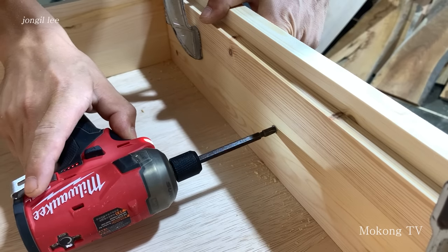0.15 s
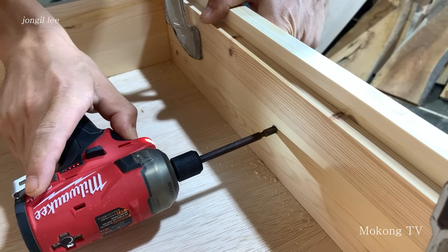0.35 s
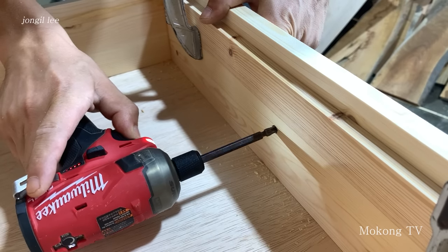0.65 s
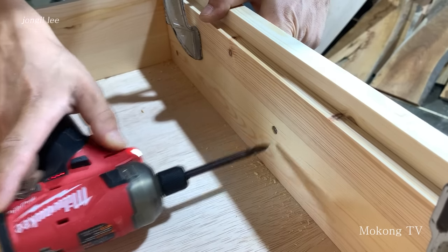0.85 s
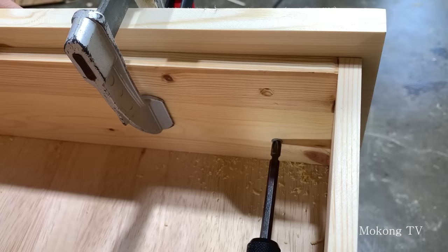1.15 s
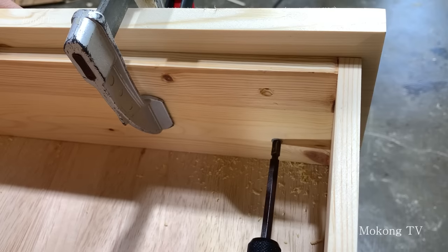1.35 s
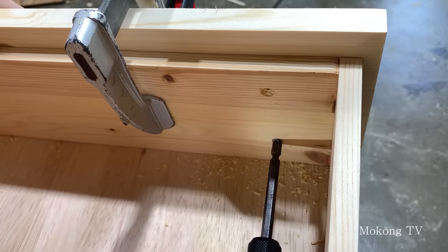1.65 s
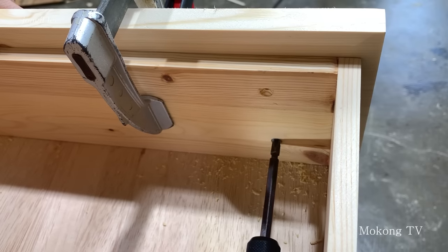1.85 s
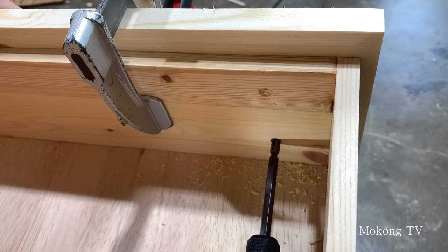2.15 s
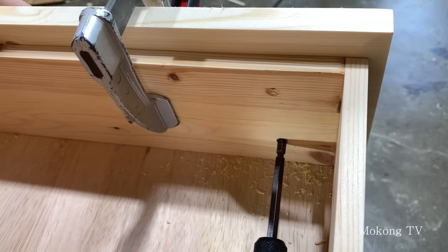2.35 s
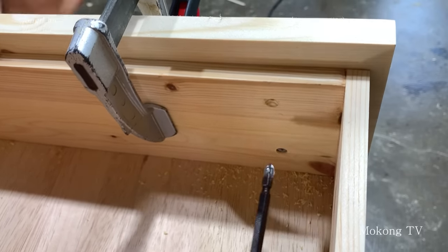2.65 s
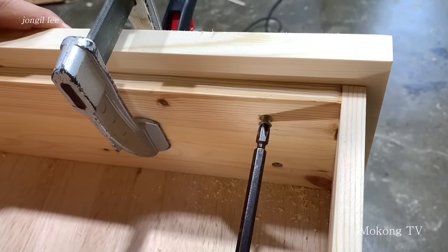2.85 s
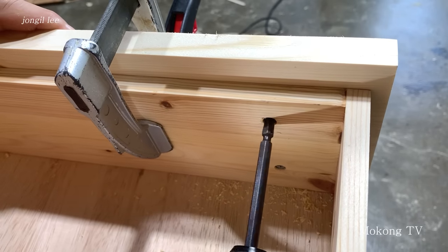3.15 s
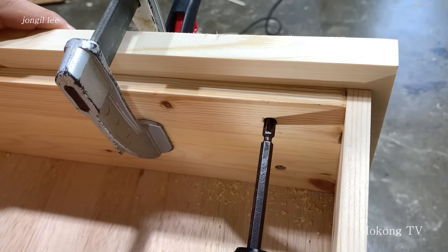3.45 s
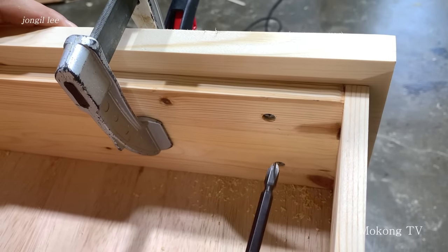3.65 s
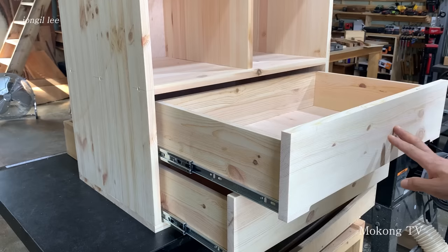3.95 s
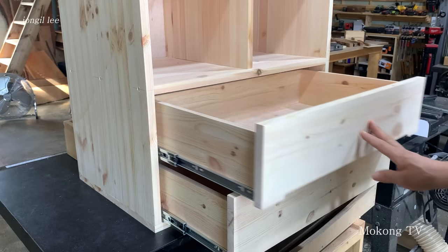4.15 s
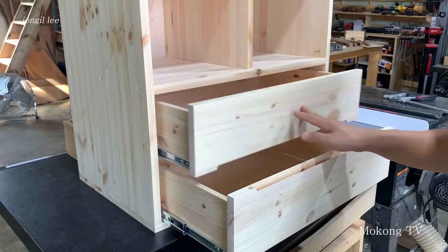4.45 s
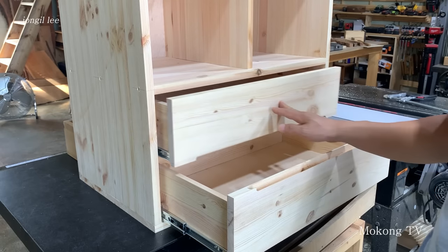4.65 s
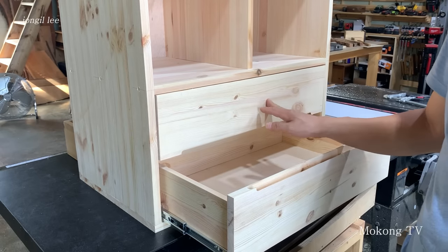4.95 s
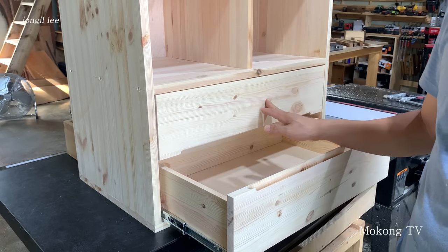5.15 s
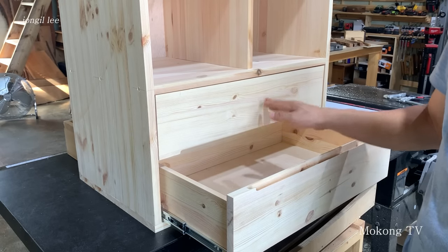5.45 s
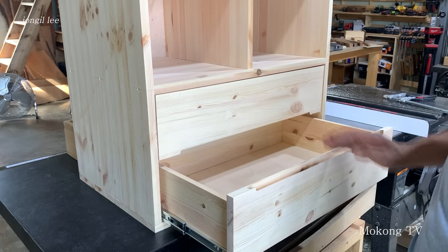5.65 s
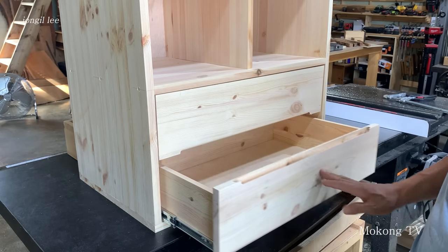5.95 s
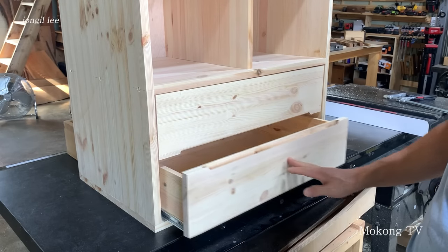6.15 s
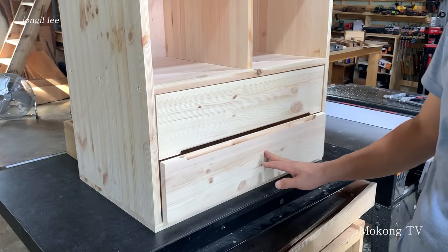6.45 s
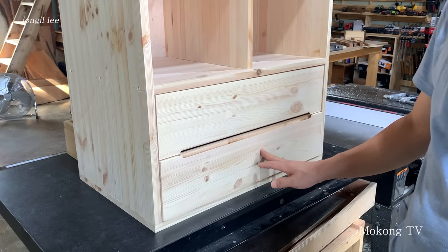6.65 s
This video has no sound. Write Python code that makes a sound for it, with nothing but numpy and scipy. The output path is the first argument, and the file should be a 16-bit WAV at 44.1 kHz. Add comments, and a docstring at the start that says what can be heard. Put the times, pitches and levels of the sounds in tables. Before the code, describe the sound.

Rapid woody ratcheting and whining from a cordless impact driver in three bursts, bit clacks between, then drawers rumble closed and knock in a workshop.

```python
"""Impact driver and rolling drawers

An impact driver sinks three screws into a clamped pine drawer: its motor whistles and its gears whine.
Evenly paced hammer blows excite the damped modes of the boards, with noise bursts for rasp and snap.
The bit clacks out of the screw heads; then two drawers roll shut on ball-bearing slides (filtered random
impulses), hit their catches and settle. A roomy workshop answers with a decaying tail and a low hum."""
import sys
import numpy as np
from scipy import signal
from scipy.fft import rfft, irfft, next_fast_len
from scipy.io import wavfile
from scipy.ndimage import uniform_filter1d, map_coordinates

SR = 44100
rng = np.random.default_rng(int(sys.argv[2]) if len(sys.argv) > 2 else 0)


def log_audio(samples):
    """Write samples as a 16-bit WAV file to the path given in sys.argv[1]."""
    # one column per channel
    frames = np.atleast_2d(samples).T
    # limit to full scale, then quantise
    limited = np.clip(frames, -1, 1)
    pcm = np.round(limited * 32767).astype(np.int16)
    wavfile.write(sys.argv[1], SR, pcm)


N = 299880  # length [samples]

# Levels in the tables are relative: the functions add their own offsets.
# Decay of the workshop: (frequency [Hz], t60 [s])
ROOM_DECAY = [(80, 1), (300, 0.34), (1500, 0.66), (4000, 0.69), (8000, 0.51), (15000, 0.57)]
# Spectrum of the workshop hum: (frequency [Hz], level [dB])
SHOP_HUM = [(15, -63.5), (30, -42.5), (58, 1.5), (77, 0), (99, -10.5), (178, -11.5), (215, -14.5),
            (305, -8.5), (552, -16), (598, -12), (648, -18.5), (1200, -24.5), (7100, -43), (8580, -38),
            (15500, -54)]
# Loss of the drawers' sound on its way to the room: (frequency [Hz], level [dB])
DRAWER_SEND = [(200, -9.5), (700, 1.0), (4000, -4.5)]

# Modes of the two drawers in their cabinet, and of the steel slide rails:
# (frequency [Hz], energy [dB], t60 [s])
UPPER_BOX = [(67, -12, 0.45), (101.2, 0, 0.64), (131, -23, 0.26), (173, 0, 0.32), (212.3, -1, 0.22),
             (250, -4.5, 0.16), (309.6, -2.5, 0.15), (429, -14, 0.16), (510, -15.5, 0.24)]
LOWER_BOX = [(132.5, -2, 0.16), (181, -2.5, 0.26), (221, -0.5, 0.11), (264.3, -2, 0.36), (304.6, 4.5, 0.15),
             (472, -15, 0.099)]
RAIL_MODES = [(2250, -8, 0.45), (2870, -2, .5), (3540, 4.5, .45), (3880, -1.5, .4), (4400, 1, .5),
              (5190, -4, 0.65), (6200, 1, 0.27), (7000, -2, .4), (8100, -14, .45)]
# Each drawer's catches, end stops and landing: (time [s], thud [dB], clack [dB], tick [dB])
UPPER_KNOCKS = [(3.996, -58, -73, -57.5), (4.004, -66, -71, -51.5), (4.343, -47, -42, -58),
                (4.352, -29, -50, -69), (4.361, -45, -52, -71), (4.448, -30.5, -35, -60),
                (4.462, -48, -54, -51.5), (4.715, -52, -55, -93), (4.88, -47.5, -67, -89.5),
                (5.262, -27, -46, -72.5), (5.287, -38, -57, -86)]
LOWER_KNOCKS = [(6.164, -40, -42, -69), (6.211, -39.5, -41, -58), (6.222, -45, -50, -63),
                (6.56, -61, -58, -88.5)]
# Each drawer's rolling: (time [s], level [dB])
UPPER_RUN = [(3.98, -90), (4.08, -61), (4.17, -50.5), (4.33, -49), (4.5, -54), (4.62, -54.5), (4.74, -58.5),
             (4.83, -61), (4.94, -66.5), (5.0, -82)]
LOWER_RUN = [(5.83, -72), (5.93, -52.5), (6.03, -48.5), (6.15, -43), (6.3, -55), (6.45, -52), (6.6, -80),
             (6.8, -63.5)]
# The soft-close damper's drag: (time [s], level [dB])
DAMPER_DRAG = [(4.66, -61.5), (4.72, -49.5), (4.78, -57), (4.83, -71), (4.9, -65), (4.96, -75)]
# The lower rail's squeak: (time [s], pitch [Hz], level [dB])
SQUEAK = [(5.82, 4480, -88), (5.85, 4560, -79), (5.89, 4620, -77), (6.06, 4670, -78.5),
          (6.15, 4540, -77), (6.2, 4380, -76)]
# Spectra of woody contacts, rail ticks, rolling, its brighter part and the damper:
# (frequency [Hz], level [dB])
CLACK_COLOUR = [(150, -32), (330, 6.5), (480, 5.5), (800, -6), (1400, -9.5), (2200, -16), (3200, -18),
                (6000, -38.5), (15000, -59.5)]
UPPER_TICK = [(1000, -5), (3300, -1), (5500, -1), (8200, -5.5), (9500, -13.5), (15000, -41)]
LOWER_TICK = [(1000, -14), (2200, 6.5), (3200, 5), (4200, -6.5), (8500, -10), (15000, -41)]
ROLLING_COLOUR = [(71, -51), (120, -19), (179, 1), (222, -9), (307, 0), (368, -7), (425, 1.5), (744, -12),
                  (1510, -19.5), (2590, -34), (4700, -40.5), (9000, -53), (11700, -82), (19800, -120)]
ROLLING_BRIGHT = [(500, -20), (1100, -0.5)]
DAMPER_HUM = [(250, -26), (380, -9), (441, 3), (500, -7), (600, -24), (1000, -51)]

# The bit engaging, seating or leaving a screw, and the tool against the drawer: (time [s], thud [dB],
# boom pitch [Hz], boom t60 [s], sway [dB], clack [dB], clack pitch [Hz], tick [dB])
TOOL_KNOCKS = [(.825, -32, 179, .15, -50, -47.5, 395, -70), (.861, -36, 128.5, 0.9, -42, -37.5, 403, -40.5),
               (2.453, -35, 160, 0.11, -34, -35, 521, -36), (2.515, -39, 167, 0.096, -54, -49, 368, -73.5),
               (2.572, -42, 159, 0.1, -55, -51, 550, -63.5), (2.701, -50.5, 167, .15, -68, -65, 450, -61),
               (2.778, -42, 205, .1, -60, -52.5, 297.4, -68), (2.803, -38, 165, .1, -60, -36.5, 480, -60),
               (3.258, -17.5, 152.2, 0.13, -34, -30, 498, -55),
               (3.36, -33.5, 174, 0.14, -54, -48, 470, -65),
               (3.512, -41.5, 170.7, 0.34, -55, -53.5, 450, -58.5),
               (3.583, -40, 171, 0.18, -57, -55, 325, -55),
               (3.606, -37.5, 132.2, 0.45, -54.5, -58, 434, -51),
               (3.82, -55, 173.4, .3, -66.5, -60, 880, -70),
               (3.855, -59.5, 130, 0.19, -69.5, -64.5, 436, -81.5)]
# Modes of the rocking drawer, the clamp's steel bar and the steel bit:
# (frequency [Hz], energy [dB], t60 [s])
SWAY_MODE = [(64, 0, 0.34)]
CLAMP_MODES = [(893, -5, 1.3), (1017, 2, 1.9), (1367, -10, 1.3)]
BIT_MODES = [(2950, -6.5, .03), (3377, -5, 0.014), (4123, -0.5, .04), (4930, -2.5, .03), (6170, -7.5, .03),
             (14450, -9, .015)]
# Jolts that reach the clamp: (time [s], level [dB])
CLAMP_JOLTS = [(2.257, -53), (3.271, -46)]

# Motor at each screw: (time [s], winding rate [Hz], whistle [dB], gear noise [dB])
MOTOR_1 = [(0, 660, -39, -34), (.11, 660, -39, -33), (.15, 660, -45, -32), (.66, 660, -43, -31),
           (.72, 700, -54, -32)]
MOTOR_2 = [(1.164, 350, -47, -33), (1.6, 345, -48, -35), (2.022, 345, -48, -35), (2.05, 800, -47, -29),
           (2.12, 1350, -51, -26), (2.26, 1400, -51, -28)]
MOTOR_3 = [(2.785, 10, -54, -70), (2.81, 280, -44, -32), (2.845, 750, -43, -26), (2.895, 1170, -51, -32),
           (3.0, 1200, -51, -31), (3.04, 1450, -51, -28), (3.22, 1470, -52, -27), (3.28, 1400, -58, -33)]
# Gear whine at each screw: (time [s], tooth rate [Hz], level [dB])
WHINE_1 = [(0, 1042, -35.5), (0.3, 1042, -42.5), (0.72, 1038, -44)]
WHINE_2 = [(2.03, 904, -45.5), (2.08, 1345, -33), (2.26, 1330, -37)]
WHINE_3 = [(2.8, 900, -41), (2.85, 1400, -37), (2.89, 1720, -33), (3.0, 1715, -32), (3.04, 1575, -33),
           (3.24, 1565, -36)]
# Overtones of the gear whine: (multiple [1], level [dB])
TOOTH_ORDERS = [(1, -6), (2, -12), (3, -7), (4, 0), (5, -9), (6, -6)]
# Groan of the wood as the first screw's tip bites: (time [s], slip rate [Hz], level [dB])
BITE = [(0, 161, -32.5), (.025, 171.4, -25), (.07, 194.5, -18), (.1, 171.6, -32.5), (.14, 169.2, -21),
        (.22, 169, -17.5), (.27, 156, -39)]

# Steady runs of blows at each screw: (first blow [s], rate [blows/s], count [1])
PACE_1 = [(0.008, 26, 2), (.096, 30, 1), (0.129, 32.38, 19), (.7175, 30, 1)]
PACE_2 = [(1.17, 18.6, 4), (1.3857, 19.4, 13)]
PACE_FAST = [(2.0505, 39.92, 8), (2.257, 32, 1)]
PACE_3 = [(2.851, 16, 2), (2.95, 27.8, 2), (3.0172, 45.6, 11), (3.247, 41, 2)]
# How hard each screw resists as it sinks: (time [s], force [dB], snap [dB])
EFFORT_1 = [(.039, -32.5, -43.5), (.095, -29.5, -47), (.129, -25, -42.5), (.2, -24, -38.5),
            (.27, -26, -32.5), (.5, -25, -39.5), (.6, -23.5, -35), (.711, -25.5, -29)]
EFFORT_2 = [(1.17, -31, -60), (1.28, -28.5, -47), (1.39, -23.5, -44.5), (1.62, -23, -47.5), (1.8, -21, -47),
            (1.92, -20.5, -41), (2.01, -20.5, -41.5), (2.1, -19.5, -28.5), (2.26, -20.5, -32)]
EFFORT_3 = [(2.81, -38, -49), (2.859, -26, -31), (2.95, -27.5, -30.5), (2.99, -23, -34.5), (3.06, -20, -32),
            (3.19, -20, -33), (3.269, -23, -41)]
# Drawer modes as driven from each screw; TIGHT once the second screw pulls the boards together:
# (frequency [Hz], energy [dB], t60 [s])
BOARD_1 = [(65, -21, .25), (97.4, -8, 0.52), (129.1, -7, 0.97), (156.6, -6.5, 0.097), (190.8, -7.5, .12),
           (288, -13, 0.15), (385, -12, 0.055), (471.6, -3.5, .075), (583, -3.5, .08), (629, 1, .07),
           (657, -2.5, .06), (820, -9, 0.067), (877, -9.5, 0.064), (971, -2.5, 0.18), (1253, 4, .068),
           (1650, -11, .045), (2060, -11.5, .036)]
BOARD_2 = [(78, -8, 0.37), (132, -7.5, .11), (172.7, 3.5, .25), (266.4, -1, .14), (335, -5.5, .07),
           (411, -3, 0.1), (497.6, 2.5, .075), (614.6, -11, 0.028), (697, -8.5, .05), (873, 1, .078),
           (1060, 0, 0.034), (1310, -3.5, .022), (1474, -7, 0.056), (1764, -12.5, 0.041), (2200, -15, 0.04)]
BOARD_TIGHT = [(75.56, -3.5, 0.5), (157, -3, 0.09), (196, 3, .2), (261.4, -2, 0.33), (325, -2.5, .12),
               (406, -7, .08), (487, -1.5, .08), (554, -7, .05), (744, -4, .06), (848, -1, .08),
               (1060, -2.5, .06), (1240, -2, .05), (1387, -1, 0.054), (1530, -6.5, .06), (1740, -9.5, .05)]
BOARD_3 = [(83, -10, 0.25), (138.7, -14.5, 0.15), (162.6, 3, 0.22), (192, 0.5, 0.11), (229, -8.5, 0.08),
           (300, -4, 0.031), (411.7, -7.5, 0.16), (519, -4.5, 0.07), (638, -4.5, 0.064), (873, -6.5, 0.15),
           (1004, -1, 0.24), (1178, -1, 0.08), (1328, 1, 0.069), (1820, -16.5, 0.058)]
# Spectra of the rasping screws, the boards' dense upper modes in each run of blows, their loose chatter,
# the bit's tick, the snap and the gear teeth: (frequency [Hz], level [dB])
RASP_1 = [(880, -17.5), (1500, -1), (2010, -4), (2170, -5), (3120, -8.5), (4020, -2.5), (6130, -8.5),
          (6750, -14), (8710, -10), (11700, -15), (15500, -13.5)]
RASP_2 = [(880, -24), (1500, 1), (2150, -3), (2470, -8), (3910, -6), (4610, -9), (5190, -4.5), (7450, -17),
          (9890, -13.5), (11200, -20), (15500, -24)]
RASP_3 = [(880, -24), (1500, -1), (1670, -3.5), (2620, -8.5), (3910, -3.5), (5500, -6.5), (6190, -6),
          (9060, -14.5), (10200, -9), (12000, -24), (15500, -17.5)]
CLATTER_1 = [(250, -33), (400, -19.5), (470, -2.5), (590, 5), (680, 8.5), (740, 0.5), (850, -1),
             (1100, -17.5), (1250, 0), (1500, -11), (2200, -12.5), (5000, -34)]
CLATTER_2 = [(250, -10), (420, -1), (510, 1), (590, -2.5), (700, -8.5), (870, -2), (1080, -5), (1250, -6.5),
             (1500, -11), (2200, -18.5), (5000, -39)]
CLATTER_FAST = [(230, -10), (320, -1.5), (420, -1.5), (580, 7.5), (680, -3.5), (950, -0.5), (1120, -7.5),
                (1240, 4.5), (1400, -0.5), (1560, -2.5), (1900, -20.5), (2130, -8.5), (2500, -22),
                (5000, -47.5)]
CLATTER_3 = [(250, -18), (500, 6), (750, -4), (1100, -3.5), (1280, 1.5), (1380, -0.5), (1550, -3.5),
             (1700, -12), (1850, -5.5), (2200, -19.5), (5000, -48)]
CHATTER_COLOUR = [(200, -30.5), (400, 0.5), (520, 1.5), (700, -10), (1300, -12), (2500, -36.5)]
BIT_TICK = [(1200, -22.5), (4000, 4.5), (8000, -4.5), (14000, -6), (16000, -13)]
SNAP_COLOUR = [(2500, -25.0), (6000, 1.5), (10000, -1.5), (16000, -10.0)]
TEETH_COLOUR = [(1500, -6.0), (4000, 3.0), (9000, 0), (13000, -2.5)]

STIFF_HZ = 615  # board modes bend below this and are stiff above
SWITCH_HZ = 9290  # the motor's switching tone
TOP_HZ, MIC_LOW_HZ = 15800, 44.5  # band limit, and the microphone's bass roll-off
THUMP_DB, THUMP_GROWS, USUAL_FORCE_DB = -14.5, 0.72, -23  # thump at the usual force; its dB per dB of force
HARDENING = 0.46  # extra dB of knock per dB of force
THUMP_SCATTER_DB, RASP_SCATTER_DB, SNAP_SCATTER_DB = 2, 1, 2  # from blow to blow
MODE_SCATTER_DB = 2.5  # each mode's share, from blow to blow
JITTER_S = .00008  # timing scatter of the blows


def amp(db):
    """Decibels to amplitude gain."""
    return 10 ** (np.asarray(db) / 20)


def unit(x):
    """Normalization to rms 1."""
    return x / np.sqrt(np.mean(x ** 2) + 1e-20)


def along(points, hz):
    """Interpolation of (frequency, value) points on a logarithmic axis."""
    f, value = np.transpose(points)
    return np.interp(np.log(hz + 1), np.log(f + 1), value)


def curves(rows):
    """Linear interpolation in time: a soft gate over the rows' span, then each column per sample."""
    s, *columns = np.transpose(rows)
    t = np.arange(N) / SR
    gate = uniform_filter1d(1. * ((t >= s[0]) & (t <= s[-1])), size=64)
    return [gate] + [np.interp(t, s, column) for column in columns]


def wobble(rate):
    """Smooth random modulation: a spline through random knots, rate of them a second."""
    knots = rng.standard_normal(int(N * rate / SR) + 4)
    return map_coordinates(knots, [np.arange(N) * rate / SR])


def phase(hz):
    """Phase [rad] as the running integral of frequency."""
    return 2 * np.pi * np.cumsum(hz) / SR


def filtered(x, response):
    """Linear filtering: the spectrum of x times a response of frequency."""
    m = next_fast_len(len(x) + 8192)
    return irfft(rfft(x, m) * response(np.fft.rfftfreq(m, 1 / SR)), m)[:len(x)]


def coloured(x, spectrum):
    """Spectral shaping of x, at rms 1."""
    return unit(filtered(x, lambda hz: amp(along(spectrum, hz))))


def noise(spectrum):
    """Fresh Gaussian noise with the given spectrum, at rms 1."""
    return coloured(rng.standard_normal(N), spectrum)


def strike(times, db, response):
    """Superposition: one copy of the response at each time and level."""
    samples = np.clip(np.round(times * SR).astype(int), 0, N - 1)
    train = np.bincount(samples, amp(db), N)
    return signal.fftconvolve(train, response)[:N]


def bursts(times, db, rise, fall):
    """Two-sided exponential envelope about each time (time constants in s)."""
    before = SR // 20
    t = np.arange(-before, SR // 4) / SR
    shape = np.exp(np.minimum(t / rise, -t / fall))
    dying = strike(times, db, shape[before:])
    swelling = strike(N / SR - times, db, shape[:before][::-1])[::-1]  # laid in reversed time
    return dying + swelling


def ringing(modes, attack, drift=0, scatter_db=0):
    """Modal superposition: damped sines with the energy of 10 ms at rms 1; drift detunes high modes most."""
    ring, t = np.zeros(SR), np.arange(SR) / SR
    for k, ((hz, db, t60), chance) in enumerate(zip(modes, rng.standard_normal(len(modes)))):
        u = t[:int(t60 * SR) + 1]
        tuned_hz = hz * (1 + drift * hz / STIFF_HZ)
        decay = amp(db + scatter_db * chance - 60 * u / t60) / np.sqrt(t60)
        ring[:len(u)] += (-1) ** k * decay * np.sin(2 * np.pi * tuned_hz * u)
    return unit(ring * (1 - np.exp(-t / attack))) / 10


def drum(times, levels, contacts, modes, attack, drift):
    """Repeated modal excitation: (delay [s], level [dB]) contacts ring a new balance, pitch drifting."""
    out = np.zeros(N + SR)
    for s, db, depth in zip(times, levels, np.linspace(-.5, .5, len(times))):
        ring = ringing(modes, attack, drift * depth, MODE_SCATTER_DB)
        for delay, contact_db in contacts:
            out[max(0, round((s + delay) * SR)):][:SR] += amp(db + contact_db) * ring
    return out[:N]


def room(x):
    """Reverberation: convolution with noise whose every frequency decays at its own rate."""
    hz, t, z = signal.stft(rng.standard_normal(SR), SR, nperseg=256)
    decay = amp(-60 * t / along(ROOM_DECAY, hz)[:, None])
    tail = signal.istft(z * decay, SR, nperseg=256)[1]
    tail *= 1 - np.exp(-np.arange(len(tail)) / SR / 0.0061)  # soft onset
    return signal.fftconvolve(x, tail / np.linalg.norm(tail))[:N]


def shop_hum():
    """Stationary background: noise shaped to the hum of the workshop."""
    return amp(-61.5) * noise(SHOP_HUM)


def damper():
    """Frictional damping: the soft-close damper drags the upper drawer home with a hollow rumble."""
    gate, db = curves(DAMPER_DRAG)
    return gate * amp(db) * noise(DAMPER_HUM)


def rail_squeak():
    """Frequency-modulated tone: the lower rail sings thinly on a gliding, unsteady pitch."""
    gate, hz, db = curves(SQUEAK)
    return gate * amp(db + 2.5 * wobble(60)) * np.sin(phase(hz + 100 * wobble(500)))


def slide(run, db):
    """Filtered random impulses: steel balls patter along the rail; louder rolling is brighter."""
    gate, level = curves(run)
    impulses = rng.standard_normal(N) * (rng.random(N) < 1500 / SR)  # about 1500 a second
    patter = coloured(impulses, ROLLING_COLOUR)
    bright = filtered(patter, lambda hz: amp(along(ROLLING_BRIGHT, hz)))
    speed = amp(level - level.max())
    return gate * amp(level + db + 0.59 * wobble(25)) * (patter + 1.4 * (speed - .5) * bright)


def drawer_knocks(rows, modes, tick_colour, thud_db, clack_db, tick_db, ring_db, clack_fall, tick_fall):
    """Impact excitation: a contact rings the box under a woody clack; the rail rattles and rings."""
    s, thud, clack, tick = np.transpose(rows)
    wood = strike(s, thud + thud_db, ringing(modes, attack=0.0038))
    wood += bursts(s, clack + clack_db, rise=0.00047, fall=clack_fall) * noise(CLACK_COLOUR)
    rattle = unit(amp(4 * wobble(400)) * noise(tick_colour))
    rail = drum(s, tick, [(0, ring_db)], RAIL_MODES, attack=.0003, drift=0)
    return wood + rail + bursts(s, tick + tick_db, rise=0.0013, fall=tick_fall) * rattle


def drawers():
    """Sum of independent sources: the upper and lower drawers roll, knock and settle."""
    upper = drawer_knocks(UPPER_KNOCKS, UPPER_BOX, UPPER_TICK, thud_db=0.0, clack_db=-0.5, tick_db=-1.5,
                          ring_db=-10.5, clack_fall=0.019, tick_fall=0.025)
    upper += slide(UPPER_RUN, db=0.5) + damper()
    lower = drawer_knocks(LOWER_KNOCKS, LOWER_BOX, LOWER_TICK, thud_db=5.5, clack_db=-2.5, tick_db=3.0,
                          ring_db=-14, clack_fall=0.019, tick_fall=0.039)
    lower += slide(LOWER_RUN, db=-5.0) + rail_squeak()
    return upper + lower


def tool_knocks(thud_db, clack_db, hollow_db, tick_db):
    """Local resonance: each bump booms and clacks at the pitch of its spot, and sways the whole drawer."""
    s, _, _, _, sway, clack, _, tick = np.transpose(TOOL_KNOCKS)
    wood = np.zeros(N + SR)
    for when, thud, boom_hz, t60, _, level, clack_hz, _ in TOOL_KNOCKS:
        boom = amp(thud + thud_db) * ringing([(boom_hz, 0, t60)], attack=0.0028)
        hollow = amp(level + hollow_db) * ringing([(clack_hz, 0, .13)], attack=.001)
        wood[round(when * SR):][:SR] += boom + hollow
    body = wood[:N] + strike(s, sway + thud_db, ringing(SWAY_MODE, attack=.004))
    body += bursts(s, clack + clack_db, rise=0.00049, fall=0.015) * noise(CLACK_COLOUR)
    rattle = unit(amp(2.5 * wobble(350)) * noise(BIT_TICK))
    return body + bursts(s, tick + tick_db, rise=.0012, fall=0.0045) * rattle


def clamp():
    """Free vibration: the last blow on a screw near the clamp leaves its bar ringing faintly."""
    s, db = np.transpose(CLAMP_JOLTS)
    return strike(s, db, ringing(CLAMP_MODES, attack=0.0017))


def groan():
    """Stick-slip: the screw tip groans low and unsteadily in fresh wood, until the thread takes hold."""
    gate, hz, db = curves(BITE)
    return gate * amp(db + 1.5 * wobble(60)) * np.sin(phase(hz * (1 + 0.066 * wobble(120))))


def whistle(run, lower_db, upper_db, flutter):
    """Modulation sidebands: windings whistle about the switching tone, farther out at faster turning."""
    gate, rate_hz, level, _ = curves(run)
    turn = phase(rate_hz * (1 + flutter * wobble(90)))
    carrier = 2 * np.pi * SWITCH_HZ * np.arange(N) / SR
    # at speed the first sidebands give way to the second lower one
    drive = np.clip(rate_hz / 1200, 0, 1) ** 5
    lower = (1 - .7 * drive) * np.sin(carrier - turn) + drive * np.sin(carrier - 2 * turn)
    upper = (1 - .75 * drive) * np.sin(carrier + turn)
    tones = amp(lower_db) * lower + amp(upper_db) * upper + amp(-13.5) * np.sin(carrier)
    return gate * amp(level + 1.2 * wobble(56)) * tones


def whine(run, flutter):
    """Harmonic series of tooth meshing: the gear teeth sing in overtones of a fluttering tooth rate."""
    gate, hz, db = curves(run)
    turn = phase(hz * (1 + flutter * wobble(130)))
    overtones = sum(amp(level) * np.sin(k * turn) for k, level in TOOTH_ORDERS)
    return gate * amp(db + 2.5 * wobble(60)) * overtones


def gears(run, colour, db, rub_db):
    """Amplitude modulation: gear hiss pulses with the shaft while the turning bit rubs the wood."""
    gate, rate_hz, _, level = curves(run)
    shaft = np.sin(phase(rate_hz) / 2)  # one turn per two winding cycles
    teeth = filtered(noise(colour), lambda hz: amp(along(TEETH_COLOUR, hz)))
    hiss = unit(teeth * (1 + 0.2 * shaft))
    return gate * amp(level + db) * (hiss + amp(rub_db) * noise(CLACK_COLOUR))


def clatter(colour, rise, fall):
    """High modal density: dense modes smear a jolt into a short rattle that peaks 20 ms in."""
    t = np.arange(-SR // 50, SR // 10) / SR
    shape = np.exp(np.minimum(t / rise, -t / fall))
    random_phase = np.angle(rfft(rng.standard_normal(len(t)) * shape))
    gain = amp(along(colour, np.fft.rfftfreq(len(t), 1 / SR)))
    ring = irfft(gain * np.exp(1j * random_phase), len(t)) * np.sqrt(shape)
    return unit(ring) * np.sqrt(np.mean(shape ** 2))


def hammer_blows(pace, effort):
    """Periodic forcing as rows (time, thump, rasp, snap); more force rasps and thumps harder."""
    s = np.concatenate([first + np.arange(count) / rate for first, rate, count in pace])
    when, force, snap = np.transpose(effort)
    force, snap = np.interp(s, when, force), np.interp(s, when, snap)
    thump = THUMP_DB + THUMP_GROWS * (force - USUAL_FORCE_DB)
    scatter = rng.standard_normal((len(s), 3)) * [THUMP_SCATTER_DB, RASP_SCATTER_DB, SNAP_SCATTER_DB]
    levels = np.column_stack([thump, force, snap]) + scatter
    return np.column_stack([s + JITTER_S * rng.standard_normal(len(s)), levels])


def anvil(blows, lead, knock_hz, knock_db, lead_db, tick_db, ring_db):
    """Impact pulses: the bit takes up its play, then hits home; two dead knocks, ticks and brief rings."""
    s, _, force, snap = np.transpose(blows)
    contacts = np.concatenate([s - lead, s]) + rng.normal(0, JITTER_S, 2 * len(s))
    share = np.repeat([lead_db, 0], len(s))
    t = np.arange(-SR // 200, SR // 200) / SR
    u = (np.pi * knock_hz * t) ** 2
    pulse = (1 - 2 * u) * np.exp(-u)  # a single swing
    knock = strike(contacts + t[0], np.tile(force, 2) + share + knock_db, pulse)
    ring = drum(s, force + ring_db, [(-lead, lead_db), (0, 0)], BIT_MODES, attack=.0002, drift=0)
    tick = bursts(contacts, np.tile(snap, 2) + share + tick_db, rise=.0006, fall=0.001) * noise(BIT_TICK)
    return knock + ring + tick


def hammer(blows, board, dense, colour, drift, lead, lag, lead_db, thump_db, knock_db, clatter_db,
           clatter_fall, chatter_db, rasp_db, snap_db, bite_db, rise, fall):
    """Impact and friction: each blow bites, then slips the screw, and kicks the whole board."""
    s, thump, rasp, snap = np.transpose(blows)
    bending = [mode for mode in board if mode[0] < STIFF_HZ]
    stiff = [mode for mode in board if mode[0] >= STIFF_HZ]
    pushes = drum(s, thump, [(-lead, lead_db), (lag, thump_db)], bending, attack=0.0005, drift=drift)
    # hard blows reach the stiff and dense modes; quick ones run together into a pitched buzz
    hard = rasp + HARDENING * (rasp - USUAL_FORCE_DB)
    jolts = drum(s, hard + knock_db, [(-lead, -10.5), (-.001, 0)], stiff, attack=0.002, drift=0)
    jolts += strike(s - 1 / 50, rasp + clatter_db, clatter(dense, rise=0.0025, fall=clatter_fall))
    # the clamped boards chatter loosely against each other
    chatter = bursts(s, thump + chatter_db, rise=0.0026, fall=0.02) * noise(CHATTER_COLOUR)
    grit = amp(5.0 * wobble(900))  # wood fibres let go in tiny slips
    contacts = np.concatenate([s - lead - .0005, s])
    share = np.repeat([bite_db, 0], len(s))
    slip = bursts(contacts, np.tile(rasp, 2) + share + rasp_db, rise, fall) * unit(grit * noise(colour))
    click = bursts(contacts, np.tile(snap, 2) + share + snap_db, rise=0.0015, fall=0.0046)
    return pushes + jolts + chatter + slip + click * noise(SNAP_COLOUR)


def first_screw():
    """Coupled sources: hammer, bit and motor, with the stick-slip groan of the biting tip."""
    blows = hammer_blows(PACE_1, EFFORT_1)
    sound = hammer(blows, BOARD_1, CLATTER_1, RASP_1, drift=0.031, lead=0.005655, lag=-0.001, lead_db=-6.5,
                   thump_db=-2.5, knock_db=-5.5, clatter_db=1.0, clatter_fall=0.0057, chatter_db=-18.0,
                   rasp_db=-2.5, snap_db=2.0, bite_db=-2.5, rise=0.0044, fall=0.0056)
    sound += anvil(blows, lead=0.0048, knock_hz=576, knock_db=12, lead_db=-5.0, tick_db=-4.5, ring_db=-14)
    sound += gears(MOTOR_1, RASP_1, db=-3.5, rub_db=3.0) + whine(WHINE_1, flutter=0.036) + groan()
    return sound + whistle(MOTOR_1, lower_db=2, upper_db=1, flutter=.01)


def second_screw():
    """Changed boundary conditions: slow blows on loose boards, then fast ones on boards pulled tight."""
    slow, fast = hammer_blows(PACE_2, EFFORT_2), hammer_blows(PACE_FAST, EFFORT_2)
    sound = hammer(slow, BOARD_2, CLATTER_2, RASP_2, drift=-0.097, lead=.0055, lag=.0035, lead_db=-5.5,
                   thump_db=0.5, knock_db=-5.0, clatter_db=-0.5, clatter_fall=0.0094, chatter_db=-11,
                   rasp_db=-7.5, snap_db=8.0, bite_db=-8.5, rise=0.002, fall=0.0041)
    sound += hammer(fast, BOARD_TIGHT, CLATTER_FAST, RASP_2, drift=0.045, lead=0.0065, lag=0.0011,
                    lead_db=-10.0, thump_db=-1.0, knock_db=-3.5, clatter_db=-2.5, clatter_fall=0.013,
                    chatter_db=-24.5, rasp_db=-7.5, snap_db=3.5, bite_db=-0.8, rise=0.0036, fall=0.0078)
    sound += anvil(slow, lead=.005, knock_hz=710, knock_db=6, lead_db=-0.5, tick_db=0.5, ring_db=-17.5)
    sound += anvil(fast, lead=.006, knock_hz=804, knock_db=7, lead_db=-2.5, tick_db=-1.0, ring_db=-14.5)
    sound += gears(MOTOR_2, RASP_2, db=-3.5, rub_db=3) + whine(WHINE_2, flutter=0.017)
    return sound + whistle(MOTOR_2, lower_db=-2, upper_db=3.5, flutter=.035)


def third_screw():
    """Coupled sources: hammer, bit and motor at a third place on the drawer."""
    blows = hammer_blows(PACE_3, EFFORT_3)
    sound = hammer(blows, BOARD_3, CLATTER_3, RASP_3, drift=-.05, lead=0.004377, lag=.004, lead_db=-6,
                   thump_db=0.5, knock_db=-6.0, clatter_db=-1.5, clatter_fall=0.0073, chatter_db=-11,
                   rasp_db=-4.5, snap_db=7.5, bite_db=-14.5, rise=0.0064, fall=0.005)
    sound += anvil(blows, lead=0.0069, knock_hz=795, knock_db=4.0, lead_db=-3.0, tick_db=5, ring_db=-16)
    sound += gears(MOTOR_3, RASP_3, db=-1.5, rub_db=0.5) + whine(WHINE_3, flutter=0.0064)
    return sound + whistle(MOTOR_3, lower_db=7.5, upper_db=1, flutter=.028)


def scene():
    """Direct and reverberant sound: the tool is close and fairly dry, the drawers deeper in the room."""
    far = drawers()
    near = tool_knocks(thud_db=5, clack_db=7.5, hollow_db=1, tick_db=-1.0) + clamp()
    near += first_screw() + second_screw() + third_screw()
    sent = amp(-11.0) * near + filtered(far, lambda hz: amp(along(DRAWER_SEND, hz)))
    return (near + far + room(sent) + shop_hum())[None]


def record(dry):
    """Saturation and band limiting: one microphone rounds the peaks and loses deep bass and top treble."""
    x = np.ravel(dry)
    rounded = x / (1 + np.abs(x / .62) ** 4) ** (1 / 4)

    def band(hz):
        """Product of a treble cut and a bass roll-off."""
        treble = np.clip((TOP_HZ + 350 - hz) / 600, 0, 1) ** 2
        return treble * (1 - np.exp(-(hz / MIC_LOW_HZ) ** 6))

    return filtered(rounded, band)[None]


dry = scene()
out = record(dry)
log_audio(out)
```